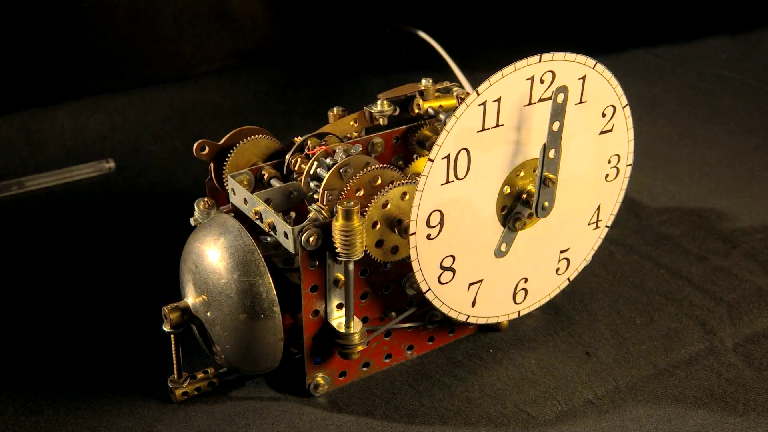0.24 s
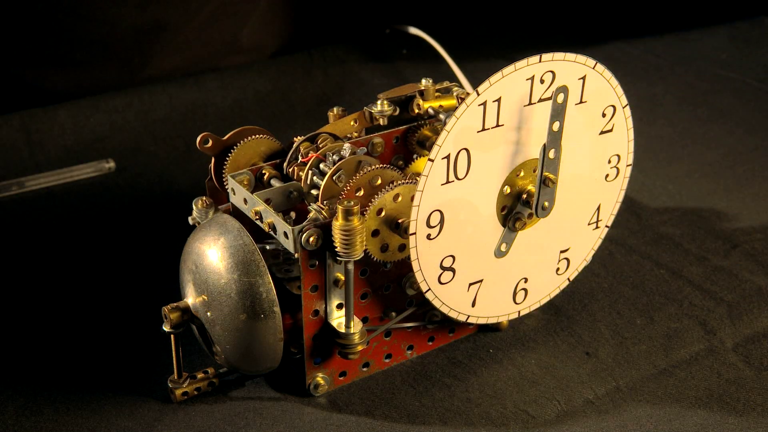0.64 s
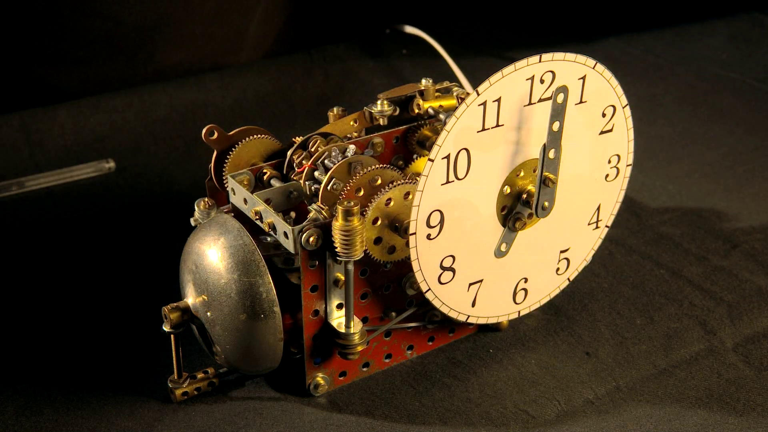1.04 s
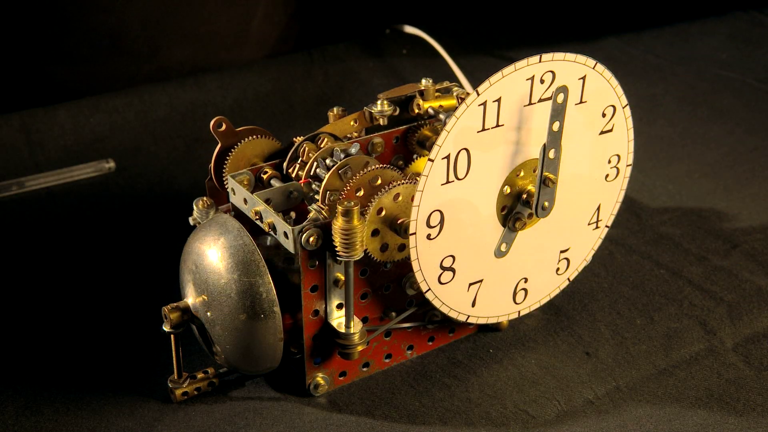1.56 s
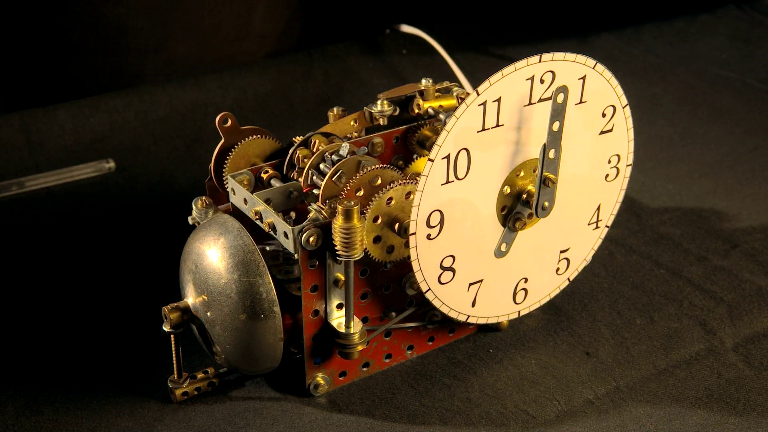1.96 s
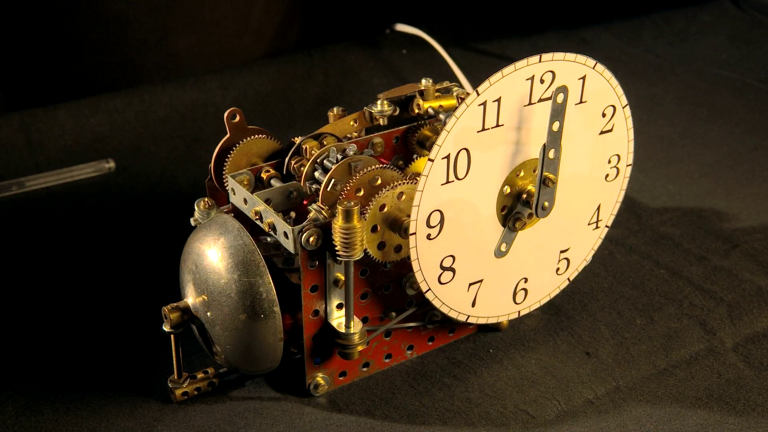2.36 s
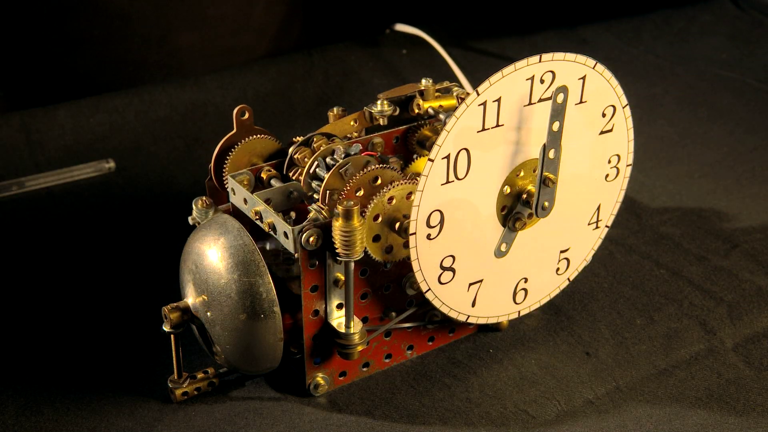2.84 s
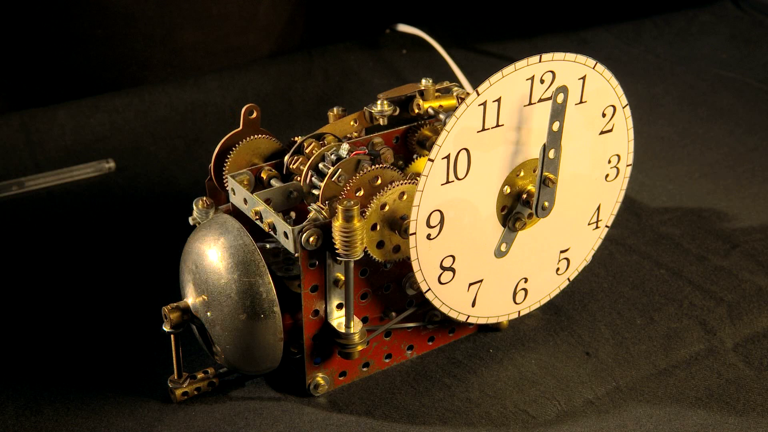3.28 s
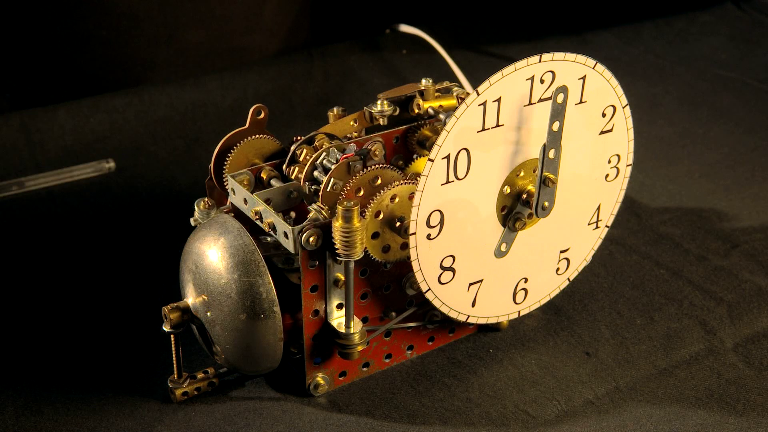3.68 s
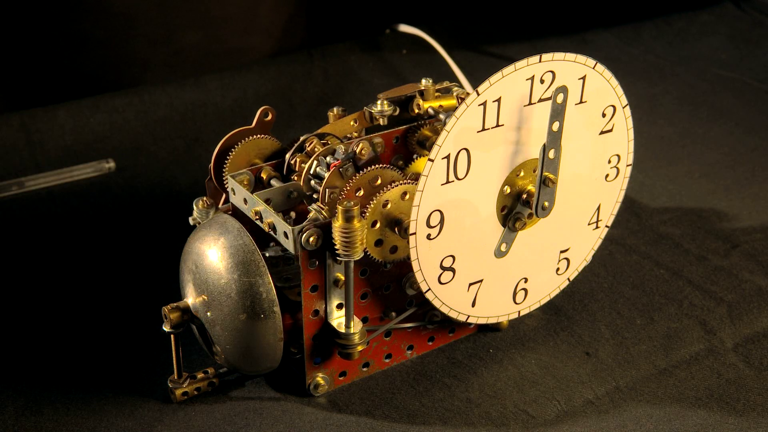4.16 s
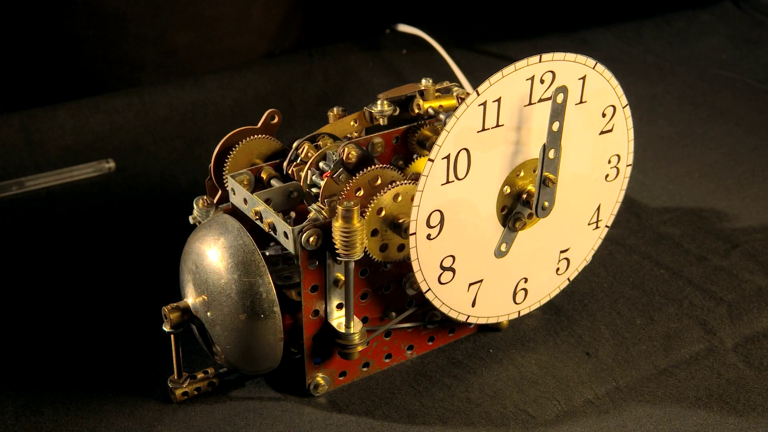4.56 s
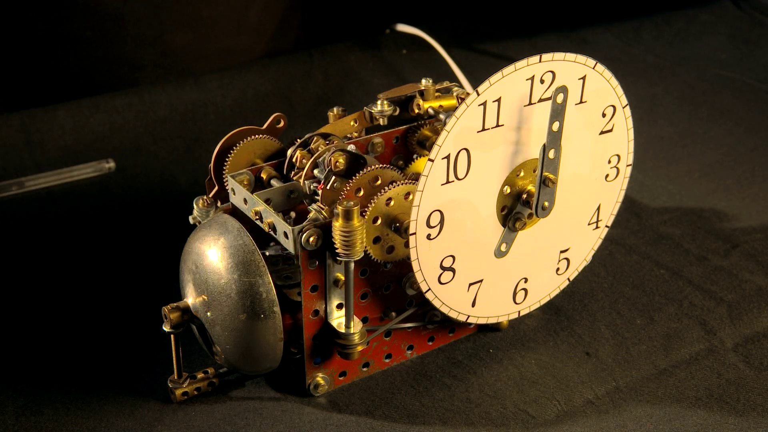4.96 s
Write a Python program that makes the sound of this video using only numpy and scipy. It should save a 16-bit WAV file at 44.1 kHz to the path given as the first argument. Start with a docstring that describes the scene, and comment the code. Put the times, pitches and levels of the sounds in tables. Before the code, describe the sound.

A mechanical clock strikes a ringing steel bell over faint whirring gears, then stops with a clunk as the bell fades.

```python
"""A steel dome bell is already ringing, close by: a home-built metal clock is striking the hour.
A small hammer lands five more blows, and the bell's paired modes beat. The hammer lever shakes the frame
at each drop and once misses the bell. Underneath, pawls catch, a bearing gives four brief squeaks,
a motor hums and its gears hiss and tick. The governor whines faintly as the striking ends;
the striking train stops with a clunk and the bell rings out."""
import sys
import numpy as np
from scipy import signal
from scipy.fft import rfft, irfft, next_fast_len
from scipy.io import wavfile
from scipy.ndimage import map_coordinates

SR = 44100
rng = np.random.default_rng(int(sys.argv[2]) if len(sys.argv) > 2 else 0)


def inscribe(sig):
    """Save sig as 16-bit PCM at rate SR to the path in sys.argv[1].

    A 1-D sig is mono; a 2-D sig holds one channel per row.
    Samples are clipped to [-1, 1] before scaling.
    """
    pcm = np.round(np.clip(np.atleast_2d(sig).T, -1, 1) * 32767)
    wavfile.write(sys.argv[1], SR, pcm.astype(np.int16))


N = 230246
TIME = np.arange(N) / SR

# the dome's long modes, each with a detuned twin:
# (pitch [Hz], twin offset [Hz], twin level [dB], t60 [s], first swell of the beat [s])
DOME_PAIRS = [(1258.675, -10.371, -10.8, 32, .01), (3179.031, -1.39, -6.1, 9.9, .28),
              (5609.358, 1.451, -8.4, 3, .653), (8445.97, .77, -2.8, 1, .54),
              (11660.8, 1.7, -6.8, .65, .22)]
# hammer blows: (time [s], contact level [dB], then five pair levels, low to high [dB])
STRIKES = [ (-.3908, -10, -53.9, -34.5, -36.5, -16.4, -14.5),
           (.23096, -5.5, -51.7, -38.2, -40.5, -23.1, -26), (.86, -10.5, -50.4, -36.6, -34.7, -23.6, -35.6),
           (1.62333, -8, -51.2, -37.9, -49.5, -39.7, -29.7),
           (2.92241, -10.5, -57.9, -39.6, -36.6, -35.9, -32.7),
           (3.5576, -10, -49.4, -46.3, -47.7, -35.2, -30.2)]
BUILD_UP_CYCLES = 3

def bell():
    """Each blow adds to the dome's ring, swelling or cancelling it; each mode beats with its twin."""
    out = np.zeros(N)
    for s, _, *levels in STRIKES:
        age = np.maximum(TIME - s, 0)
        for db, (hz, offset_hz, twin_db, t60, first_swell) in zip(levels, DOME_PAIRS):
            cycles = hz * age
            twin_cycles = cycles + offset_hz * (age - first_swell)
            pair = np.sin(2 * np.pi * cycles) + amp(twin_db) * np.sin(2 * np.pi * twin_cycles)
            attack = 1 - np.exp(-cycles / BUILD_UP_CYCLES)
            out += amp(db) * attack * fade(age, t60) * pair
    return np.sqrt(2) * out


# the dome's short, bright modes: (pitch [Hz])
PING_HZ = [6934, 12285, 13333, 13867, 15255]
# strength and decay of those modes: (level [dB], t60 [s])
PING_DECAYS = [(-41, 0.069), (-27, 0.14), (-42, .11), (-42, 0.075), (-26.5, 0.067)]
# the bite of steel on steel: (frequency [Hz], level [dB])
CONTACT_EQ = [(200, -28), (700, -37), (1300, -6.5), (2500, -14.5), (4500, -17), (6000, 1.5), (7800, -1),
              (10000, -10), (12500, -1), (15500, -8.5)]
REBOUND_S, REBOUND_DB = .00112, -8

def hammer():
    """The steel head touches twice in about a millisecond and wakes the short, bright modes."""
    out, t = np.zeros(N), TIME[:SR // 2]
    modes = [(hz, db, t60) for hz, (db, t60) in zip(PING_HZ, PING_DECAYS)]
    for s, contact_db, *_ in STRIKES:
        touch = impact(t, CONTACT_EQ, chatter=.17, chatter_t60=.005, tail_db=-37, tail_t60=.06)
        touch *= amp(contact_db)
        add(out, s, touch + ring(modes, t, scatter_db=.5))
        add(out, s + REBOUND_S, amp(REBOUND_DB) * touch)
    return out


# hard hits on the frame: (time [s], knock level [dB], click level [dB])
KNOCKS = [(2.181, -33, -35), (2.1865, -32, -25.5), (2.195, -35, -30), (4.1087, -11, -13.5),
          (4.1127, -22.5, -26), (4.1482, -42, -24), (4.1691, -40, -31)]
# the frame's ring: (pitch [Hz], level [dB], t60 [s])
FRAME_MODES = [(106.5, -7, 0.27), (128.4, -8, 0.19), (250.5, -17.5, 0.24), (294.3, -15, 0.27),
               (349, -19, .12), (524, -16, 0.11), (734, -21, 0.041), (882, -20, 0.046), (1040, -21, 0.035),
               (1390, -20, 0.06), (1750, -26, .04), (1980, -26, 0.05), (2460, -31, 0.033)]
# the dull body of a knock: (frequency [Hz], level [dB])
KNOCK_EQ = [(25, -34), (70, -24), (200, 11), (490, 8), (640, -2), (780, 5), (1020, 9.5), (1500, -6),
            (2200, -9.5), (4500, -10), (9000, -41)]
# its metallic edge: (frequency [Hz], level [dB])
CLICK_EQ = [(1500, -39), (4500, -8), (7200, 3.5), (9000, 2), (11500, -1), (15500, -9)]

def knocks():
    """The missed blow and the final stop jolt the frame: it clunks and rings, and loose parts shiver."""
    out, t = np.zeros(N), TIME[:SR // 2]
    for s, knock_db, click_db in KNOCKS:
        clunk = impact(t, KNOCK_EQ, chatter=.11, chatter_t60=.014, tail_db=-30, tail_t60=.2)
        click = impact(t, CLICK_EQ, chatter=.15, chatter_t60=.015, tail_db=-27.5, tail_t60=.08)
        frame = amp(-14) * ring(FRAME_MODES, t, scatter_db=1.5)
        add(out, s, amp(knock_db) * (clunk + frame) + amp(click_db) * click)
    return out


# the hammer lever's drops: (time [s], sway level [dB], shudder level [dB])
DROPS = [(0.229, -46, -50.5), (0.859, -44, -49), (1.623, -43.5, -49.5), (2.185, -43, -47.5),
         (2.922, -45.5, -46.5), (3.557, -45, -45.5), (4.281, -50, -61)]
# the frame's low shudder: (frequency [Hz], level [dB])
SHUDDER_EQ = [(40, -26), (78, -15), (106, 6), (135, -6), (190, -10), (300, -11), (450, -18), (800, -43)]
# the lever's midrange rattle: (frequency [Hz], level [dB])
RATTLE_EQ = [(150, -17), (400, 6), (900, -1), (2000, -4), (5000, -8), (9000, -14), (15000, -54)]
SWAY_HZ, RATTLE_VS_SHUDDER_DB = 52, -13

def lever():
    """The lever rattles off its cam; the frame shudders and sways on its base as it lands."""
    shudder, rattle, sway = np.zeros((3, N))
    for s, sway_db, shudder_db in DROPS:
        t = TIME - s
        sliding = np.clip((t + .038) / .0092, 0, 1)
        rattle += amp(shudder_db + RATTLE_VS_SHUDDER_DB) * sliding * swell(t + .0055, rise=.11, fall=.034)
        shudder += amp(shudder_db) * sliding * swell(t - .016, rise=.11, fall=.029)
        sway += amp(sway_db) * np.exp(-((t - .023) / .022) ** 2) * np.sin(2 * np.pi * SWAY_HZ * t)
    shudder *= noise(SHUDDER_EQ)
    rattle *= unit(noise(RATTLE_EQ) * amp(4.4 * wobble(250)))
    return sway + shudder + rattle


# pins and pawls catching between the drops: (time [s], level [dB])
CATCHES = [(0.494, -38.5), (1.250, -39), (1.354, -44), (1.801, -38), (3.185, -37), (3.669, -38.5),
           (3.84, -39.5), (3.948, -37), (4.268, -32)]
# their soft, low tick: (frequency [Hz], level [dB])
CATCH_EQ = [(40, 0), (130, 8), (250, 10), (500, 3), (1050, -1), (2500, -3.5), (4500, -10), (9000, -14),
            (15000, -22)]

def catches():
    """A pin or pawl meets the next part with a light tick that barely rings the frame."""
    out, t = np.zeros(N), TIME[:SR // 2]
    for s, db in CATCHES:
        tick = impact(t, CATCH_EQ, chatter=.12, chatter_t60=.014, tail_db=-33, tail_t60=.12)
        frame = amp(-17) * ring(FRAME_MODES, t, scatter_db=1.5)
        add(out, s, amp(db) * (tick + frame))
    return out


# four brief squeaks from a bearing, then a faint, longer governor whine near 2150 Hz:
# (peak time [s], length [s], pitch [Hz], level [dB], pitch jitter [Hz])
SQUEAKS_AND_GOVERNOR = [(0.059, 0.028, 3960, -49.5, 250), (1.972, .026, 3970, -58.5, 70),
                        (1.998, 0.067, 3930, -64, 22), (2.125, 0.034, 3960, -64, 35),
                        (3.88, .45, 2150, -84, 16)]

def squeaks_and_governor():
    """Unsteady tones: a dry bearing's stick and slip, then the governor's whine as the striking ends."""
    out = np.zeros(N)
    for s, length, hz, db, jitter_hz in SQUEAKS_AND_GOVERNOR:
        pitch = hz + jitter_hz * wobble(700)
        partials = tone(pitch) + amp(-10) * tone(2 * pitch) + amp(-14) * tone(2.75 * pitch)
        out += amp(db) * np.exp(-(2 * (TIME - s) / length) ** 2) * partials
    return out


# the gear train's whine: (multiple of the mesh rate [ratio], level [dB])
WHINE_TONES = [(.57, -94), (1, -84.5), (1.16, -87.5), (2, -81.5), (2.5, -83.5), (4.022, -84)]
# the motor's low bed: (frequency [Hz], level [dB])
RUMBLE_EQ = [(20, 7), (45, 8), (75, -7), (120, 0), (155, 1), (182, 3), (215, -6.5), (245, -2.5), (290, -14),
             (420, -19.5), (800, -50.5)]
MESH_HZ, MESHES_PER_HUM_CYCLE = 1626, 15
RACE_HZ, RACE_S, RACE_DB = 32, .17, 4  # freed by a drop: mesh rate gain, time to peak, hum boost
SAG_HZ, SAG_S = 32, .06  # slowed by a catch: mesh rate loss, time to bottom
IDLE_AT_S, RELAX_S = 4.3, .12  # the striking train is let go
HUM_DB, RUMBLE_DB = -67.5, -61.3
IDLE_HUM_DB, IDLE_RUMBLE_DB = -13, -3  # change at idle
WHINE_DB_PER_HUM_DB = .33

def motor():
    """The motor hums, rumbles and drives the gears: it races after drops, sags at catches, then idles."""
    race = surges(DROPS[:-1], RACE_S)
    idle = np.clip((TIME - IDLE_AT_S) / RELAX_S, 0, 1)
    mesh_hz = MESH_HZ + RACE_HZ * race - SAG_HZ * surges(CATCHES, SAG_S)
    effort_db = RACE_DB * race + IDLE_HUM_DB * idle
    hum_hz = mesh_hz / MESHES_PER_HUM_CYCLE + 3 * wobble(18)
    hum = amp(HUM_DB + effort_db + 2.4 * wobble(10)) * tone(hum_hz)
    whine_hz = mesh_hz + 6 * wobble(30)
    whine = sum(amp(db + 3.3 * wobble(12)) * tone(multiple * whine_hz) for multiple, db in WHINE_TONES)
    whine *= amp(WHINE_DB_PER_HUM_DB * effort_db)
    rumble = amp(RUMBLE_DB + IDLE_RUMBLE_DB * idle + 1.4 * wobble(12)) * noise(RUMBLE_EQ)
    return hum + whine + rumble + gears(idle)


# the gears' hiss: (frequency [Hz], level [dB])
HISS_EQ = [(200, -2), (450, -6), (700, -10), (1400, -12.5), (1900, -6), (2700, -20.5), (3400, -1),
           (4100, -10), (4400, -6.5), (6200, -6), (7000, 0), (8400, -10), (9100, -6.5), (10400, -12),
           (11000, -13), (15500, -12.5)]
# gear resonances: (centre [Hz], width [Hz], level within the gear mix [dB])
WHIRR_BANDS = [(3264, 61, -13.5), (3980, 120, -16), (6820, 220, -12), (7230, 180, -14.5),
               (9050, 210, -13.5), (10340, 200, -15.5)]
GEAR_MIX_DB, IDLE_TICKS_DB = -63.2, -2

def gears(idle):
    """Turning gears hiss, whirr and tick; the ticks soften as idle goes from 0 to 1."""
    hiss = amp(-4) * unit(noise(HISS_EQ) * amp(2.3 * wobble(240) + .6 * wobble(25)))
    resonances = sum(amp(db) * whirr(hz, width_hz) for hz, width_hz, db in WHIRR_BANDS)
    ticks = amp(-7 + IDLE_TICKS_DB * idle) * teeth(rate=91, spread_db=3.5)
    return amp(GEAR_MIX_DB) * (hiss + resonances + ticks)


def whirr(hz, width_hz):
    """A narrow, restless gear resonance that comes and goes."""
    band = [(hz + widths * width_hz, db) for widths, db in zip((-4, -1, 0, 1, 4), (-40, -10, 0, -10, -40))]
    return unit(noise(band) * amp(2.8 * wobble(7.8)))


# the crisp tick of one tooth: (frequency [Hz], level [dB])
TOOTH_EQ = [(4000, -22), (6000, -1), (6900, -4), (8200, -3.5), (9200, 3.5), (10400, -7), (11500, -15),
            (15000, -10)]

def teeth(rate, spread_db):
    """Gear teeth catch at random, in loose clusters around rate per second, each with a tiny tick."""
    hits = rng.random(N) < rate / SR * amp(5 * wobble(8))
    sizes = hits * amp(spread_db * np.clip(rng.standard_normal(N), -2, 2))
    envelope = signal.fftconvolve(sizes, fade(TIME[:SR // 50], t60=.0047))[:N]
    return unit(envelope * noise(TOOTH_EQ))


def impact(t, eq, chatter, chatter_t60, tail_db, tail_t60):
    """One sharp push, a brief chatter and a faint tail, in the colour of the parts that meet."""
    scatter = chatter * fade(t, chatter_t60) + amp(tail_db) * fade(t, tail_t60)
    return coloured((t == 0) + scatter * rng.standard_normal(len(t)), eq)


def ring(modes, t, scatter_db):
    """Damped modes, at slightly new strengths for every blow."""
    return sum(amp(db + scatter_db * rng.standard_normal()) * np.sin(2 * np.pi * hz * t) * fade(t, t60)
               for hz, db, t60 in modes)


def tone(hz):
    """A sine of rms 1 that follows a pitch curve."""
    return np.sqrt(2) * np.sin(2 * np.pi * np.cumsum(hz) / SR)


def noise(eq):
    """Coloured noise of rms 1."""
    return unit(coloured(rng.standard_normal(N), eq))


def coloured(x, eq, size=8192):
    """x through a causal, unit-energy filter shaped by (frequency [Hz], level [dB]) points."""
    eq_hz, db = np.transpose(eq)
    hz = np.fft.rfftfreq(size, 1 / SR)
    gain = amp(np.interp(np.log(hz + 1), np.log(eq_hz), db))
    cepstrum = irfft(np.log(gain))
    response = irfft(np.exp(rfft(2 * cepstrum[:size // 2], size)))
    return signal.fftconvolve(x, response / np.linalg.norm(response))[:len(x)]


def wobble(rate):
    """A smooth random curve, rate knots a second."""
    return map_coordinates(rng.standard_normal(int(N * rate / SR) + 4), [TIME * rate])


def fade(t, t60):
    """Silence before the start, then an exponential decay."""
    return (t >= 0) * np.exp(-np.log(1000) * np.abs(t) / t60)


def swell(t, rise, fall):
    """An exponential rise to 1 at t = 0, and a fall after it."""
    return np.exp(np.minimum(t / rise, -t / fall))


def surges(events, top_s):
    """Each event adds a bump that reaches 1 after top_s and returns more slowly."""
    ages = [np.maximum(TIME - s, 0) / top_s for s, *_ in events]
    return sum(age * np.exp(1 - age) for age in ages)


def add(track, s, sound):
    """Mix in a sound at time s, if it starts within the track."""
    start = round(s * SR)
    if 0 <= start < N:
        track[start:start + len(sound)] += sound[:N - start]


def amp(db):
    """Decibels to gain."""
    return 10 ** (np.asarray(db) / 20)


def unit(x):
    """x scaled to rms 1."""
    return x / np.sqrt(np.mean(x ** 2) + 1e-20)


def scene():
    """The bell up front and the clockwork behind it, in mono."""
    return (bell() + hammer() + knocks() + lever() + catches() + squeaks_and_governor() + motor())[None]


HIGH_CUT_HZ = 15900

def record(dry):
    """A steep high cut takes off the very top."""
    size = next_fast_len(N + SR // 2)
    hz = np.fft.rfftfreq(size, 1 / SR)
    gain = 1 / np.sqrt(1 + (hz / HIGH_CUT_HZ) ** 120)
    return irfft(rfft(dry, size) * gain, size)[:, :N]


dry = scene()
out = record(dry)
inscribe(out)
```